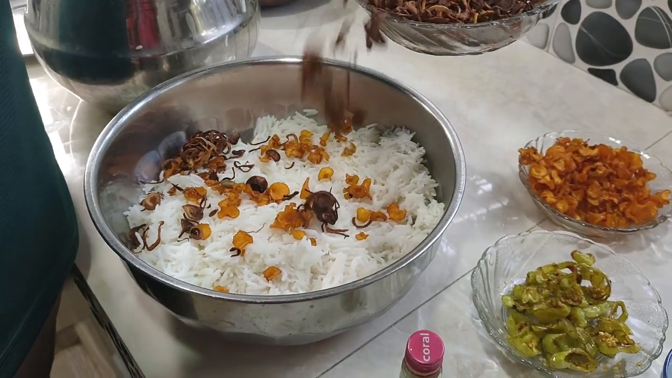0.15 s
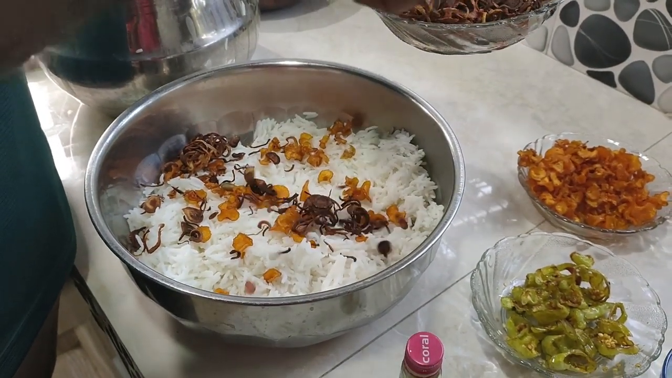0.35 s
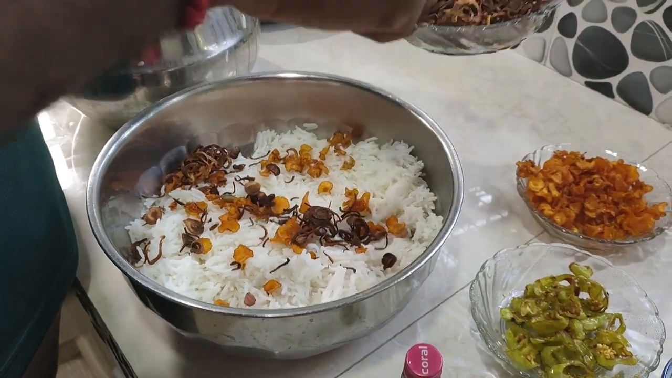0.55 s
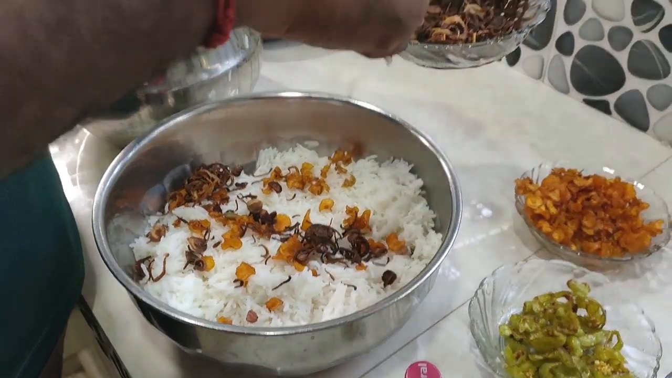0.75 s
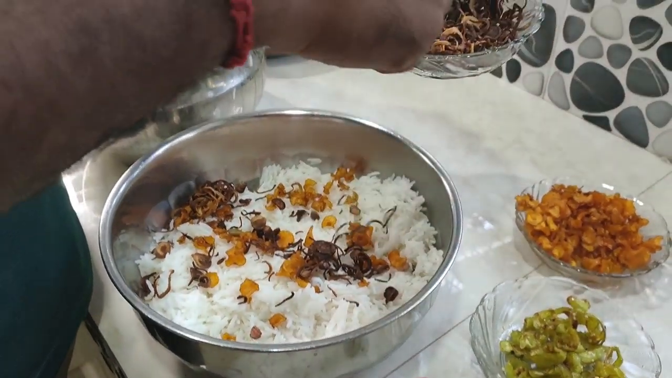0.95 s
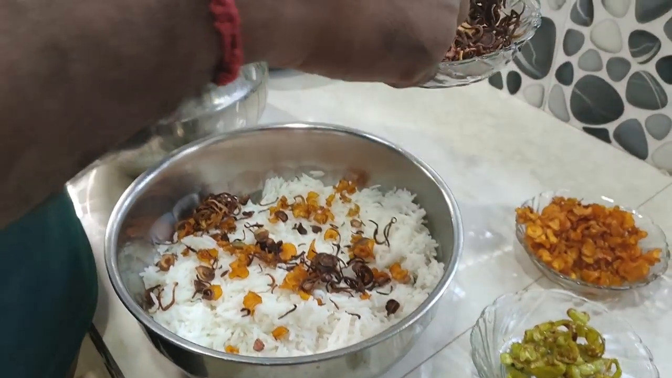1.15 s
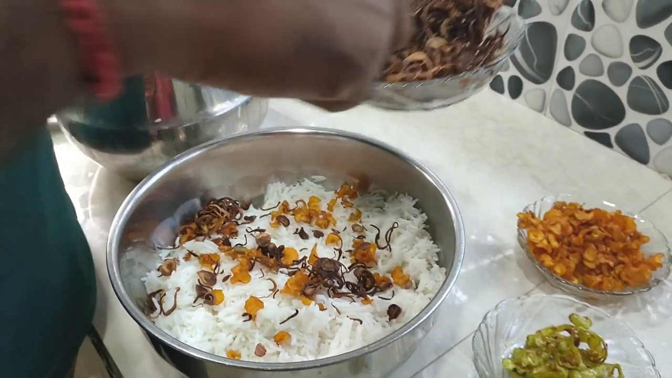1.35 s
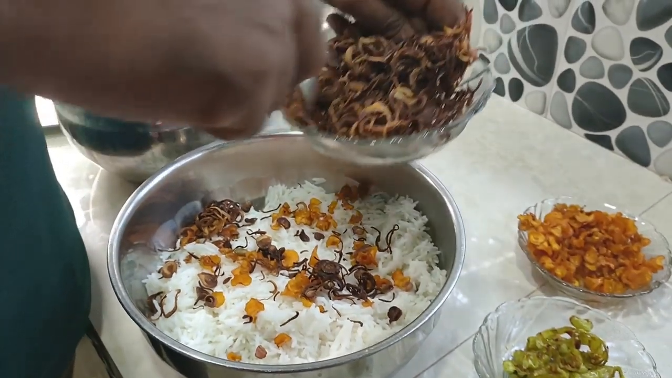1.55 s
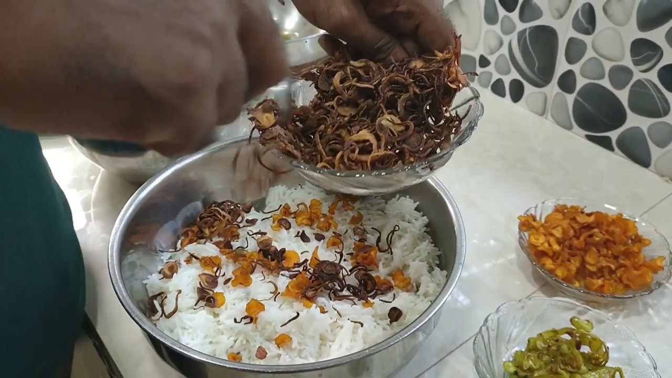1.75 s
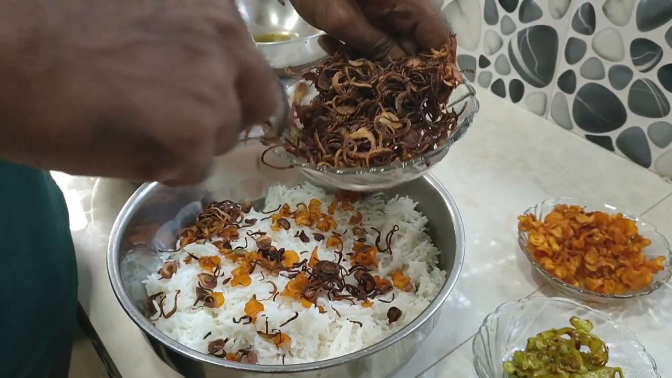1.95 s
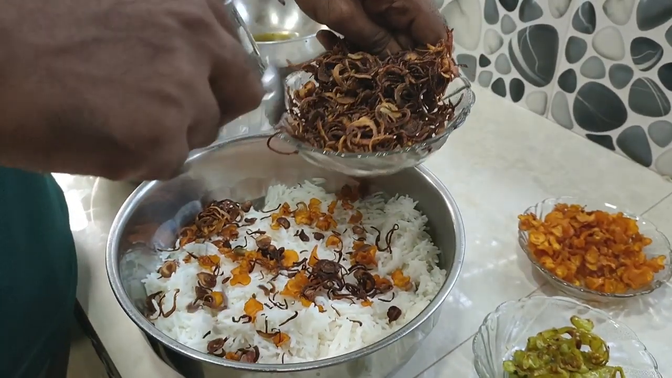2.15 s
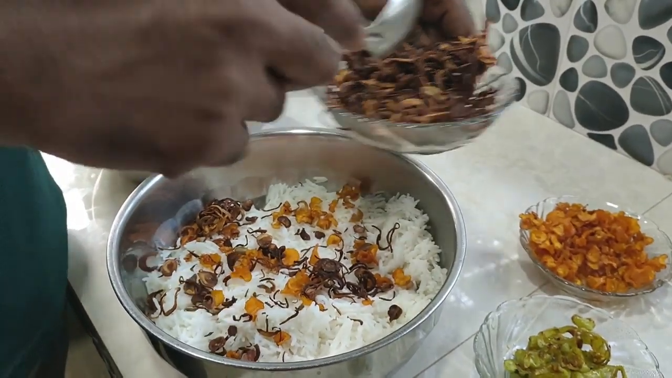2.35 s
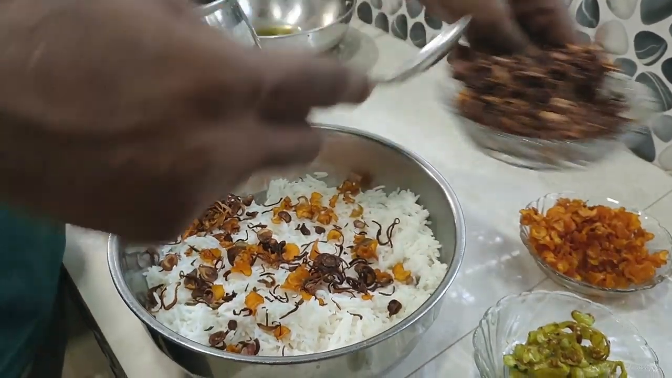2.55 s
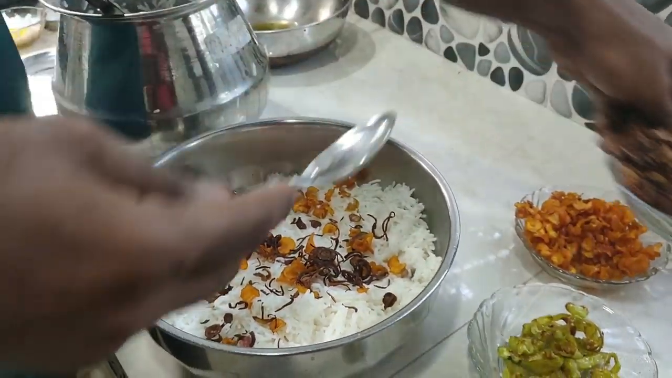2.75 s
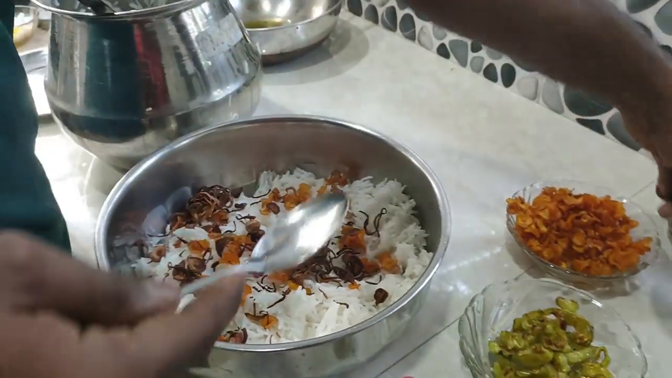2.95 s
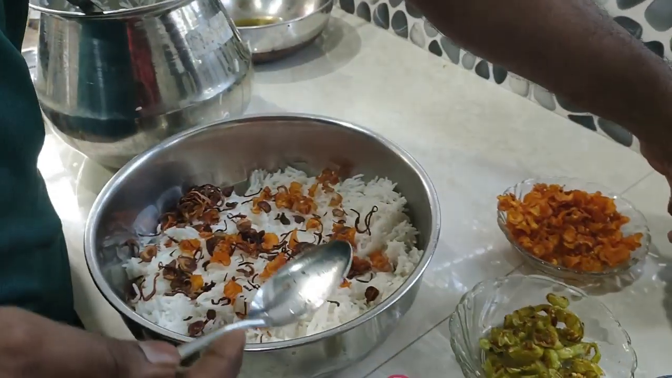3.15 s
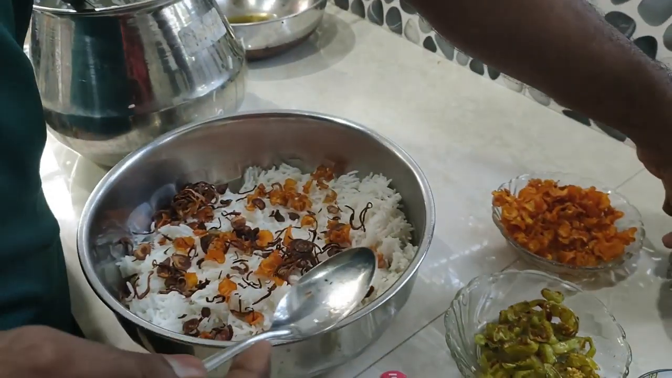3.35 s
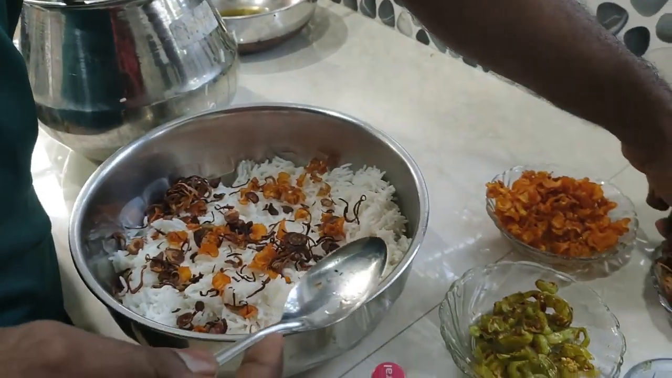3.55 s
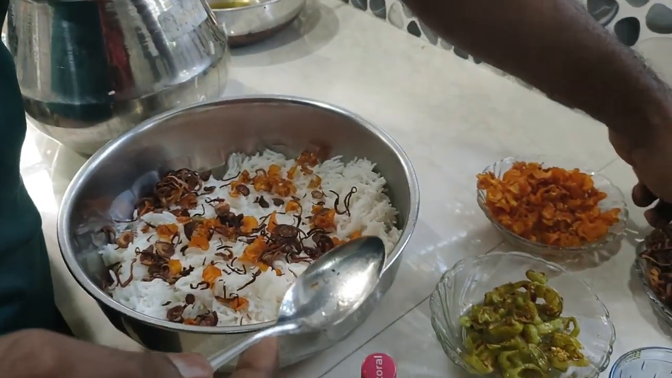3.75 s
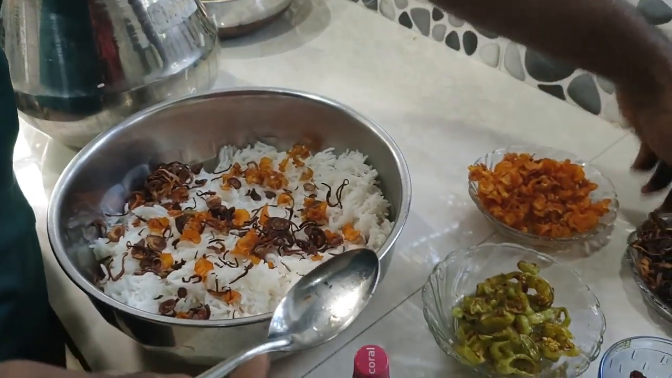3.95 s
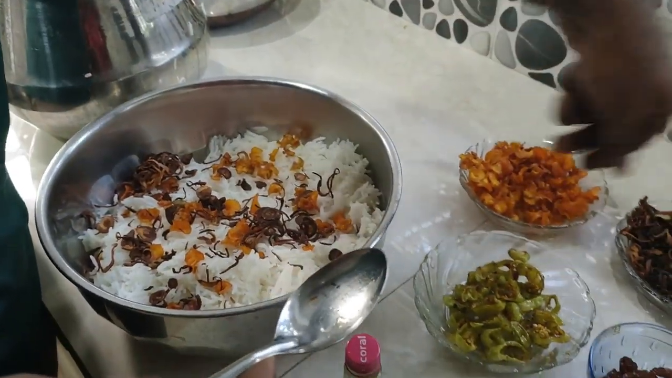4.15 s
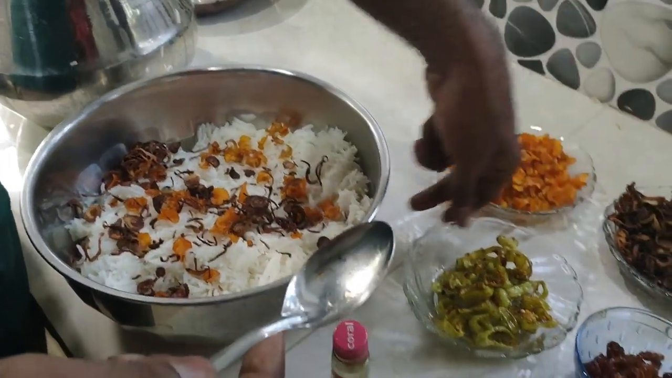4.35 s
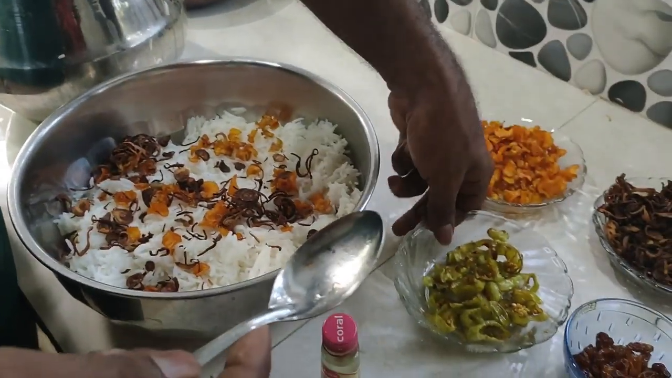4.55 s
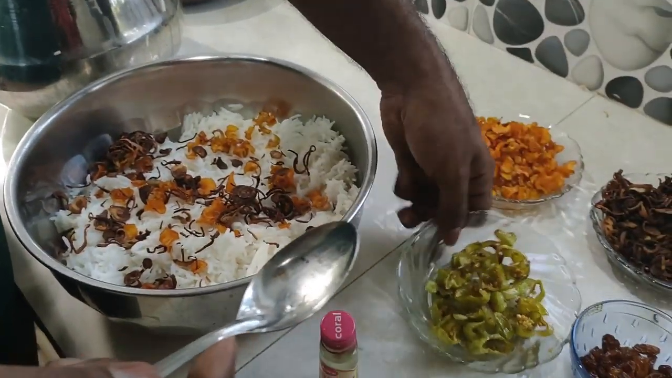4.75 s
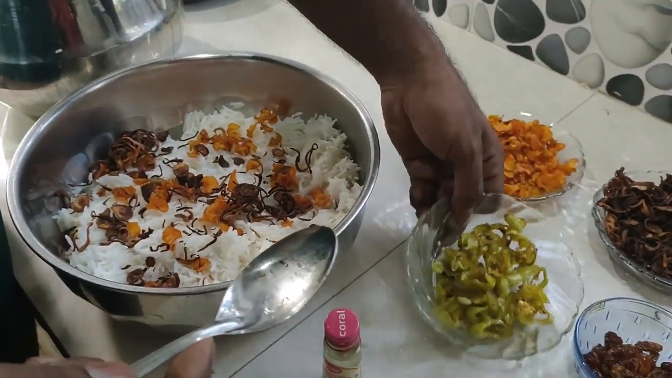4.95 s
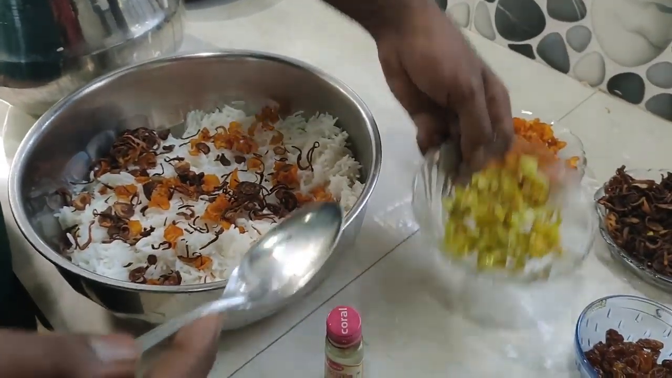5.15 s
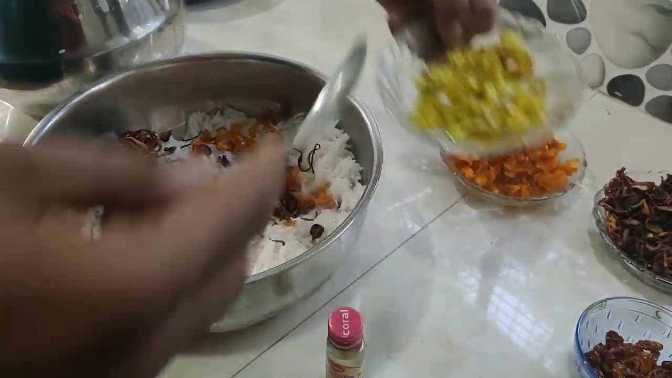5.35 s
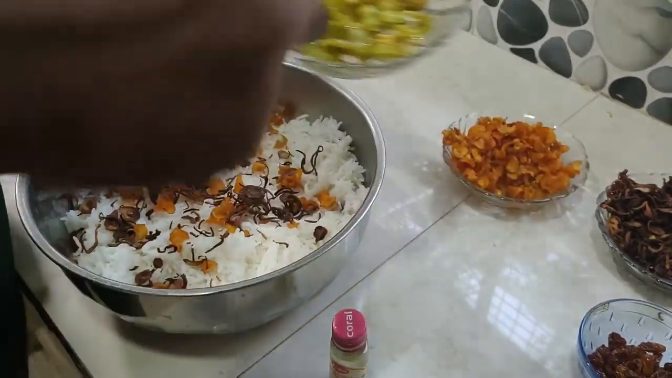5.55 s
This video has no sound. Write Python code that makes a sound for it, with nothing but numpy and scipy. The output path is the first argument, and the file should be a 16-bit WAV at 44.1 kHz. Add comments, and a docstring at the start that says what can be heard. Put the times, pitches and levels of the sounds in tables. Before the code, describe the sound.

Faint dry crackling and tiny glass ticks, a sudden hard dish set-down that rocks, then a quieter glass-on-glass clack over low hum.

```python
"""Crisp fried garnish rustles and snaps as a spoon rakes it out of a glass dish, now and then ticking the glass.
The dish then lands on a stone counter and rocks; later a second dish knocks against its neighbour.
The place is a small hard-walled kitchen; steel pots ring along, over a low motor hum and an even air noise.
Food is shaped noise grains, glass and steel are dying sine modes, and blows are chattering clicks;
echoes come from discrete paths and dying noise, and the background from shaped noise and sines."""
import sys
import numpy as np
from scipy import signal
from scipy.fft import rfft, irfft
from scipy.io import wavfile
from scipy.ndimage import map_coordinates

SR = 44100
rng = np.random.default_rng(int(sys.argv[2]) if len(sys.argv) > 2 else 0)


def waveform_to_disk(signal):
    """Save audio, clipped to [-1, 1], as 16-bit WAV at the path in sys.argv[1]."""
    frames = np.transpose(np.atleast_2d(signal))
    scaled = np.clip(frames, -1, 1) * 32767
    samples = np.round(scaled).astype(np.int16)
    wavfile.write(sys.argv[1], SR, samples)


N = 250482

# colour of the crisp food, also of the spoon's ticks: f/Hz, level/dB (relative)
CRISP_COLOUR = [(710, -12.5), (1400, -9), (2500, -11), (3200, -14), (3900, -11), (4700, -20.5),
                (5800, -13.5), (6900, -3), (7900, -3.5), (10000, -5.5), (12400, -16.5), (15600, -19)]
DISH_PAN_DB = 9.5   # left-right setting of ticks and snaps, positive to the left; add() scales it over frequency


def rustle(cracks_per_s=2500, spread_db=3.0):
    """Broken garnish rubs together: many tiny cracks of uneven size, clumped and driven by the spoon."""
    pan_db, clump_db = 7.5, 2
    sizes = from_db(spread_db * np.minimum(rng.exponential(1, N), 5)) * rng.choice([-1, 1], N)
    happens = rng.random(N) < cracks_per_s / SR
    cracks = sizes * happens * from_db(clump_db * drift(60))
    grains = rms_one(colour(cracks, CRISP_COLOUR))
    out = np.zeros((2, N))
    add(out, 0, grains * pressure(), pan_db)
    return out


def pressure():
    """Each stroke swells, sags while held and lifts off quickly; the strongest one at a moment is heard."""
    # spoon pushing through the garnish: full pressure reached t/s, held/s, level/dB
    strokes = [(0.001, .68, -75), (.205, 0.015, -64), (0.456, 0.0082, -63.5), (.83, 0.0056, -68.5),
               (1.104, .42, -65.5), (1.65, 0.11, -77), (1.767, 0.19, -65.5), (2.095, 0.0076, -71),
               (2.18, 0.0081, -90), (2.3, 0.2, -81)]
    swell_db_per_s, sag_db_per_s, lift_db_per_s = 262, 11, 492   # before, during and after the hold
    t = np.arange(N) / SR
    curves = []
    for s, held, db in strokes:
        swell = swell_db_per_s * np.maximum(s - t, 0)
        sag = sag_db_per_s * np.clip(t - s, 0, held)
        lift = lift_db_per_s * np.maximum(t - s - held, 0)
        curves.append(db - swell - sag - lift)
    return from_db(np.max(curves, axis=0))


def snaps():
    """A crisp piece breaks in a short gritty burst, in the colour of the rustle but shaded its own way."""
    # pieces snapping: t/s, peak level ahead of panning/dB, treble tilt/(dB per octave)
    breaks = [(0.0300, -47, -1), (0.092, -51.5, -6), (0.107, -44, 2), (0.1223, -42, 3.5), (0.162, -47, 0),
              (0.647, -55.5, 0), (0.802, -51, -3.5), (0.853, -54, 3), (1.355, -52, 1), (1.3694, -39, 3.5),
              (1.3952, -70, 8), (1.707, -48.5, 2), (1.7598, -43, 0), (1.774, -53, 3), (1.81, -42.5, 2),
              (1.847, -40, 7), (1.869, -45, -3), (1.8724, -35.5, 2.5), (2.066, -55, -2),
              (2.0907, -46.5, -1), (2.102, -46, 8), (2.118, -56, 7), (2.169, -44.5, 5.5)]
    crisp_t60_s, shade_spread_db = 0.017, 2.5
    out = np.zeros((2, N))
    shades = rng.standard_normal((len(breaks), len(CRISP_COLOUR)))
    for (s, db, tilt_db), shade in zip(breaks, shades):
        own = [(hz, level_db + shade_spread_db * a) for (hz, level_db), a in zip(CRISP_COLOUR, shade)]
        snap = peak_one(colour(burst(crisp_t60_s, click=2.8), own, tilt_db))
        add(out, s, from_db(db) * snap, DISH_PAN_DB)
    return out


def touches():
    """A gritty tick on glass sets the wall's modes ringing; food and fingers damp the ring."""
    # spoon or fingernail on glass: t/s, tick level/dB, ring level relative to the tick/dB,
    # place on the wall (0 low, 1 high)
    contacts = [(0.2859, -43.5, -19, 0), (0.2964, -49.5, -4, 0), (0.323, -43, -10, 0),
                (0.395, -47.5, -28, 0), (1.647, -41, -19, 0), (1.912, -37, -21, 1), (2.262, -52, -11.5, 1),
                (2.279, -66, -14, 1), (2.3073, -55.5, -5, 1), (2.3486, -59, -2, 1), (2.4163, -68, -3.5, 1),
                (2.455, -63, -18, 1), (4.475, -64, -4, 0)]
    # modes low on the glass wall: f/Hz, level/dB, t60/s
    low_modes = [(3200, -12, 0.03), (5400, -12, 0.02), (6070, -4, 0.022), (6190, -9, 0.022),
                 (8970, -9, 0.025), (11900, -20, .02)]
    # modes high on the glass wall: f/Hz, level/dB, t60/s
    high_modes = [(3970, -3.5, 0.02), (5550, -2.5, 0.0091), (6560, 2, 0.011), (7140, 2, 0.015),
                  (9200, -7, 0.012)]
    touch_t60_s = .035
    out = np.zeros((2, N))
    for s, db, ring_db, high in contacts:
        tick = peak_one(colour(burst(touch_t60_s, click=13.7), CRISP_COLOUR, 0.48))
        ring = from_db(ring_db) * ringing(high_modes if high else low_modes, 1.8)
        add(out, s, from_db(db) * (tick + ring), DISH_PAN_DB)
    return out


def set_down():
    """The garnish dish lands on stone and rocks: chattering thuds and the ring of its glass."""
    # landing and rocking: t/s, thud level/dB, left-right setting/dB, treble tilt/(dB per octave),
    # ring level relative to the thud/dB
    landings = [(3.3568, -9, 3, 2, -26.5), (3.4342, -14.5, 4.5, 1.1, -32), (3.461, -22.5, -4, -3, -34),
                (3.488, -30.5, 4.5, -4.5, -22), (3.6472, -30.5, 3.5, -3.5, -32),
                (3.6505, -33.5, 3, -6.5, -35), (3.6545, -43, -3, -4, -27), (3.822, -46.5, 2, -6.5, -34.5),
                (3.852, -71, 11, -3, -10)]
    # colour of the thud: f/Hz, level/dB (relative)
    thud_colour = [(120, -37), (330, -26), (600, -26.5), (980, -15), (1300, -6), (1720, -0.5), (2250, 7.5),
                   (2850, -7.5), (3350, -9.5), (3800, -19.5), (4500, -36.5), (5700, -40.5), (6200, -25.5),
                   (6900, -17), (7900, -41.5), (8350, -50), (8900, -51), (9720, -24.5), (11000, -55),
                   (13500, -50), (15500, -73)]
    # modes of the garnish dish: f/Hz, level/dB, t60/s
    dish_modes = [(1540, -2, 0.054), (3330, 3, 0.01), (3480, -9.5, 0.017), (5020, -12, 0.035),
                  (6160, -6, 0.11), (6290, -22, 0.064), (6850, -12, 0.056), (7500, -9, 0.03),
                  (8700, -16, 0.047), (9350, -3, 0.026), (13200, -27, 0.062)]
    return knocks(landings, thud_colour, dish_modes)


def dish_knock():
    """Glass clacks on glass and rings on, until fingers close on the second dish and damp it."""
    # dish against dish: t/s, clack level/dB, left-right setting/dB, treble tilt/(dB per octave),
    # ring level relative to the clack/dB
    blows = [(4.498, -52.5, 3.5, -3, -37), (4.5675, -25.5, 9, 7.5, -7.5), (4.6005, -21, -3, -4.5, -18),
             (4.607, -27, 0.5, -5, -48), (4.686, -51, 8, 2, -2), (4.691, -36, -1.5, -9, -43),
             (4.7155, -48, 9, -3.5, -9)]
    # colour of the clack: f/Hz, level/dB (relative)
    clack_colour = [(120, -65), (350, -31), (700, -26), (1150, -6), (1750, 2), (2400, -1.5), (3400, -9.5),
                    (4500, -20.5), (5100, -42), (5700, -29), (6500, -21.5), (7300, -2.5), (8200, -23),
                    (11200, -46), (15000, -78)]
    # modes of the second dish: f/Hz, level/dB, t60/s
    dish_modes = [(1670, -9, .27), (1690, -10, .06), (3934, -11, .33), (3951, -15, .1), (5045, -24, .12),
                  (5075, -26, .09), (7039, -4, .15), (7052, -8, .11), (10920, -24, .17), (13700, -34, .1),
                  (14840, -36, .13), (2202, -2, .1), (2380, -6, .04), (2750, -9, .04), (3235, -5, .06),
                  (5100, -9, .03), (6500, -22, .04), (7350, -12, .06), (9600, -30, .06), (11750, -34, .05)]
    grip_s, grip_db_per_s = 4.69, 260
    clack, clink = knocks(blows, clack_colour, dish_modes)
    held_s = np.maximum(np.arange(N) / SR - grip_s, 0)
    return clack, clink * from_db(-grip_db_per_s * held_s)


def knocks(rows, body, modes):
    """A short thud of dense vibration, and the glass ringing on."""
    thuds, rings = np.zeros((2, 2, N))
    for s, db, pan_db, tilt_db, ring_db in rows:
        thud = peak_one(colour(chatter(), body, tilt_db))
        add(thuds, s, from_db(db) * thud, pan_db)
        add(rings, s, from_db(db + ring_db) * ringing(modes, 0.19, signs=False), pan_db)
    return thuds, rings


def chatter():
    """One blow breaks into many close contacts as the foot chatters."""
    returned = 0.54   # share of a blow that comes back (0-1)
    lags_s = np.array([.0002, .0004, .0009]) * rng.uniform(.8, 1.25, 3)
    blow = signal.unit_impulse(SR // 8) + 1e-18   # the tiny offset keeps the loops fast
    return scatter(blow, lags_s, returned)


def burst(t60, click=0):
    """A sharp first contact and a dying spray of smaller, uneven ones."""
    grit_db = -2.5   # unevenness
    luck = rng.standard_normal((2, SR // 2))
    spray = rms_one(luck[0] * from_db(grit_db * luck[1])) * dying(t60)
    spray[0] += click
    return spray


def ringing(modes, scatter_db, signs=True):
    """One blow on a body: each mode with a strength, and perhaps a sign, of its own."""
    t = np.arange(SR // 2) / SR
    luck = rng.standard_normal((len(modes), 2))
    total = 0
    for (hz, db, t60), (a, b) in zip(modes, luck):
        strength = from_db(db + scatter_db * a) * (np.sign(b) if signs else 1)
        total = total + strength * dying(t60) * np.sin(2 * np.pi * hz * t)
    return total


def add(out, s, sound, pan_db):
    """Places a sound left or right; the shadow acts most in the mid treble, the left side hears it later."""
    # shadow between the sides: f/Hz, factor on the left-right setting
    shadow = [(400, 0.05), (1000, 0.91), (2500, 2.46), (5000, 4.06), (9000, 0.038)]
    left_later_s = .0005
    for side in range(2):
        i = round((s + left_later_s * (1 - side)) * SR)
        gains = [(hz, share * pan_db * (.5 - side)) for hz, share in shadow]
        shaded = colour(sound, gains, size=512)
        out[side, i:i + len(sound)] += shaded[:N - i]


def far_return(landing):
    """Walls and shelves return a landing in a colour of their own."""
    # returned colour: f/Hz, level/dB
    return_colour = [(300, 3), (900, 6), (1300, 2), (1680, 1), (2050, -9), (2800, -2), (3500, -5.5),
                     (4500, 7.5), (9000, 5.5)]
    return np.array([colour(x, return_colour, size=1024) for x in landing])


def near_walls(x):
    """A few separate echoes from near walls, dull in the treble."""
    # first echoes: t/s, level/dB ahead of the treble cut
    echoes = [(.0055, -24.5), (.0085, -1.5), (0.0129, -9.5), (0.0246, -10)]
    cut_hz = 2900
    paths = np.zeros(SR // 10)
    for s, db in echoes:
        paths[round(s * SR)] = from_db(db)
    dull_paths = signal.lfilter(*signal.butter(2, cut_hz, fs=SR), paths)
    return signal.fftconvolve(x, [dull_paths], axes=1)[:, :N]


def steel_nearby(x):
    """Blows stir pots and a shelf; each ear hears the modes with its own strengths, a little after the blow."""
    # steel modes: f/Hz, level/dB, t60/s
    steel_modes = [(960, -44, 0.17), (1135, -55, 0.2), (1307, -46, 0.22), (1494, -48, 0.17),
                   (1571, -49, 0.22), (1690, -44, 0.14), (1723, -48, 0.18), (1883, -49, 0.22),
                   (2000, -54, 0.2), (2067, -56, 0.18), (2197, -55, 0.2), (2337, -54, 0.17),
                   (2427, -57, 0.2)]
    later_s = 0.0065
    wait = np.zeros(round(later_s * SR))
    rings = [np.r_[wait, ringing(steel_modes, 2.0)] for side in range(2)]
    return signal.fftconvolve(x, rings, axes=1)[:, :N]


def microphone_body(near):
    """Reflections off the microphone's body smear each side by close repeats of its own."""
    # loop delays: one row for left, one for right, each of three t/s
    body_paths_s = [(.00011, .00037, .0009), (.00017, .00052, .0013)]
    share = .38   # returned each time round (0-1)
    return np.array([scatter(x + 1e-18, paths, share) for x, paths in zip(near, body_paths_s)])


def room(x):
    """Dense reflections, other ones at each ear, build up within about a millisecond and die band by band."""
    # reverberation: f/Hz, t60/s
    room_t60 = [(200, 0.24), (800, 0.55), (2000, 0.44), (5500, 0.21), (12000, 0.16)]
    build_up_s = 0.0004   # time constant
    edges, t = 138 * 2 ** np.arange(0, 7.1, .5), np.arange(SR // 2) / SR
    white, echo = rng.standard_normal((2, 2, SR // 2)), 0   # neighbouring bands get unrelated noise
    for k, (low, high) in enumerate(zip(edges, edges[1:])):
        sos = signal.butter(2, [low, high], "band", fs=SR, output="sos")
        band = signal.sosfilt(sos, white[k % 2])
        echo = echo + band * dying(at_hz(room_t60, np.sqrt(low * high)))
    echo = echo * (1 - np.exp(-t / build_up_s))
    echo = echo / np.sqrt(np.sum(echo ** 2) / 2)   # unit energy, averaged over the ears
    return signal.fftconvolve(x, echo, axes=1)[:, :N]


def background():
    """Air noise, widest in the deepest bass, nearly alike in the low mids, somewhat wider above; a motor hum."""
    # air common to both sides: f/Hz, level/dB (relative)
    air_mid = [(41, -16.5), (70, -2.5), (80, -9), (129, -5.5), (158, -3), (298, -3), (357, -5), (468, -8),
               (943, -12.5), (1060, -10.5), (1210, -12.5), (2670, -14.5), (4800, -27.5), (7720, -21),
               (15600, -47.5)]
    # air opposed between the sides: f/Hz, level/dB (relative)
    air_side = [(15, -19.5), (25, -6), (52, -10.5), (91, -22), (306, -21.5), (400, -21), (649, -21.5),
                (2630, -20.5), (5020, -35), (8610, -29.5), (15600, -61)]
    # steady turns of the motor: f/Hz, level/dB (relative)
    turns = [(24.5, -3.5), (49, 4)]
    # wavering parts of the hum: f/Hz, width/Hz, level/dB (relative)
    wavering = [(49, 10, -9), (66, 8, -12), (109, 14, -13), (155, 8, -20)]
    # hum over time: t/s, level of steady turns/dB, level of wavering parts/dB
    hum_level = [(0, -59.5, -58), (1, -62, -57.5), (2, -59, -57), (3, -62.5, -59.5), (5, -61, -63.5),
                 (5.68, -64.5, -61)]
    mid_db, side_db = -66.5, -69   # air, ahead of its slow wavering
    steady_db, waver_db = in_time(hum_level)
    white = rng.standard_normal((2 + len(wavering), N + SR))   # the first second lets filters settle
    mid = from_db(mid_db) * rms_one(colour(white[0], air_mid)[SR:])
    side = from_db(side_db) * rms_one(colour(white[1], air_side)[SR:])
    hum = 0
    for hz, db in turns:
        hum = hum + from_db(steady_db + db) * np.sin(2 * np.pi * hz * np.arange(N) / SR)
    for noise, (hz, width, db) in zip(white[2:], wavering):
        sos = signal.butter(1, [hz - width / 2, hz + width / 2], "band", fs=SR, output="sos")
        narrow = signal.sosfilt(np.vstack([sos, sos]), noise)[SR:]
        hum = hum + from_db(waver_db + db) * rms_one(narrow)
    return patchy(mid + side * np.array([[1], [-1]])) + hum


def patchy(x):
    """Each region of the spectrum swells and sinks slowly on its own."""
    # borders between the regions: f/Hz
    borders_hz = [100, 300, 700, 1500, 3000, 6000, 12000]
    waver_db = 1.2
    lows = [signal.sosfiltfilt(signal.butter(2, hz, fs=SR, output="sos"), x) for hz in borders_hz]
    bands = np.diff([0 * x, *lows, x], axis=0)
    return sum(from_db(waver_db * drift(3)) * band for band in bands)


def drift(per_s):
    """A smooth random curve around zero through normal random points, per_s of them each second."""
    points = rng.standard_normal(int(N / SR * per_s) + 4)
    return map_coordinates(points, [np.arange(N) / SR * per_s], order=3)


def scatter(x, lags_s, share):
    """All-pass loops spread a sound into many close repeats and favour no pitch."""
    for lag in np.round(np.multiply(lags_s, SR)).astype(int):
        loop = np.r_[1, np.zeros(lag - 1), -share]
        x = signal.lfilter(loop[::-1], loop, x)
    return x


def colour(x, spectrum, tilt_db=0, size=4096):
    """Causal (minimum-phase) filter that follows a spectrum, tilted about 2 kHz."""
    hz = np.maximum(np.arange(size // 2 + 1) * SR / size, 10)
    gain_db = at_hz(spectrum, hz) + tilt_db * np.log2(hz / 2000)
    cepstrum = irfft(gain_db * np.log(10) / 20)
    cepstrum[1:size // 2] *= 2   # folding the cepstrum forward makes the phase minimal
    cepstrum[size // 2 + 1:] = 0
    response = irfft(np.exp(rfft(cepstrum)))
    return signal.fftconvolve(x, response)[:len(x)]


def dying(t60, length=.5):
    """Exponential decay by 60 dB in t60 seconds."""
    return from_db(-60 * np.arange(int(length * SR)) / SR / max(t60, .002))


def at_hz(points, hz):
    """Reads a table at given frequencies, straight between points on a log frequency axis."""
    return np.interp(np.log(hz), np.log(np.array(points)[:, 0]), np.array(points)[:, 1])


def in_time(rows):
    """Turns each column of a timed table into a curve over the whole scene."""
    s, *columns = np.transpose(rows)
    return [np.interp(np.arange(N) / SR, s, c, right=c[-1]) for c in columns]


def from_db(db):
    """Decibels to amplitude."""
    return 10 ** (np.asarray(db) / 20)


def rms_one(x):
    """Scales a sound to an rms of one."""
    return x / np.sqrt(np.mean(x ** 2) + 1e-20)


def peak_one(x):
    """Scales a sound to a peak of one."""
    return x / np.abs(x).max()


def scene():
    """Raking, set-down and dish knock close by, then their echoes and the background."""
    room_db, close_room_db, ring_room_db = -3.5, -3, -5   # sent to the room: blows, light sounds, glass rings
    light = touches() + snaps() + rustle()
    landing, ring = set_down()
    clack, clink = dish_knock()
    glass = ring + clink
    far = far_return(landing) + clack
    near = landing + clack + near_walls(far) + steel_nearby(far) + light + glass
    # light sounds near the microphone have a room send of their own
    to_room = from_db(room_db) * far + from_db(close_room_db) * light + from_db(ring_room_db) * glass
    return microphone_body(near) + room(to_room) + background()


def record(dry):
    """The top is cut steeply, 60 dB down from 15.92 kHz."""
    return signal.sosfilt(signal.cheby2(16, 60, 15920, fs=SR, output="sos"), dry)


dry = scene()
out = record(dry)
waveform_to_disk(out)
```